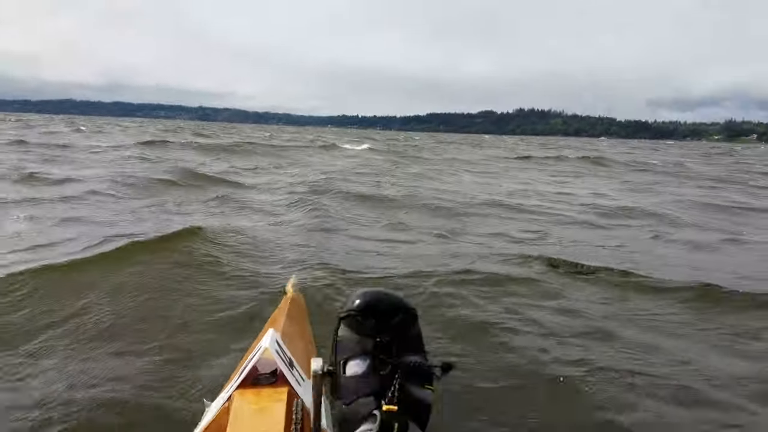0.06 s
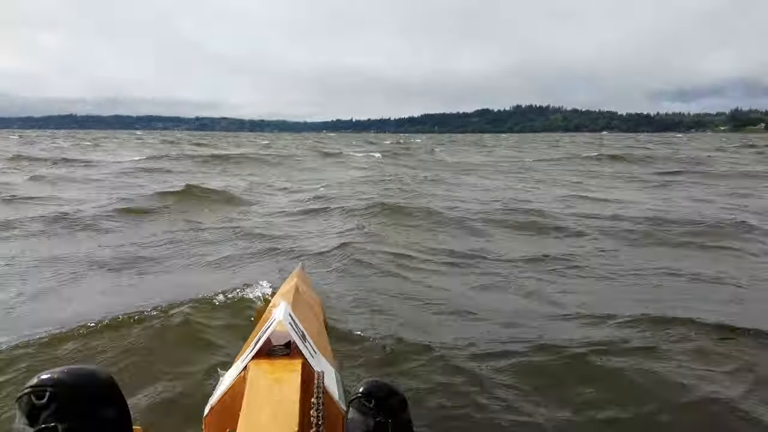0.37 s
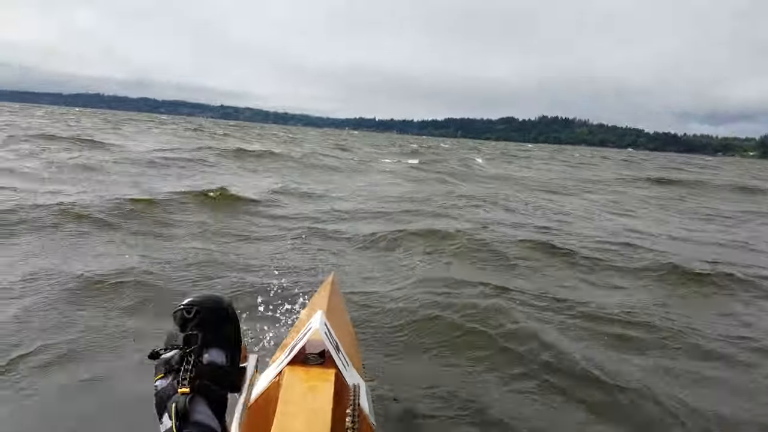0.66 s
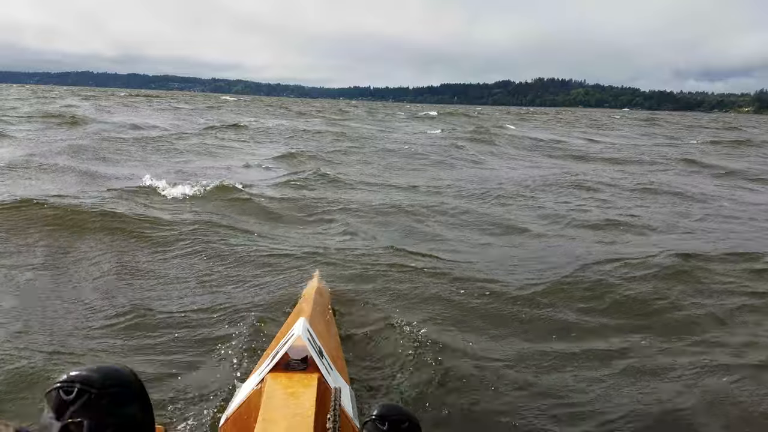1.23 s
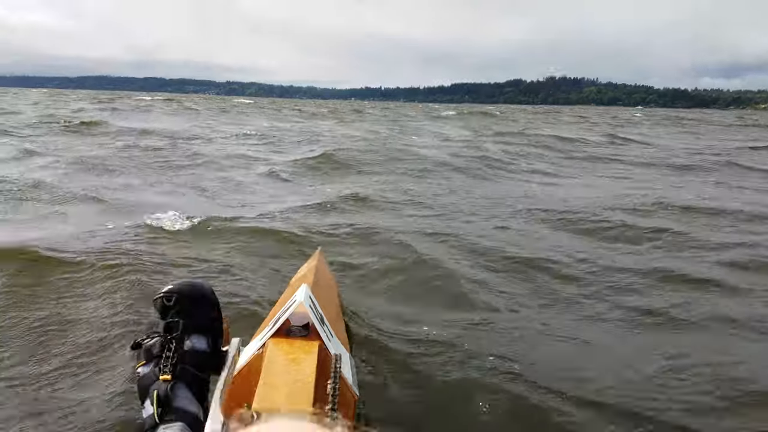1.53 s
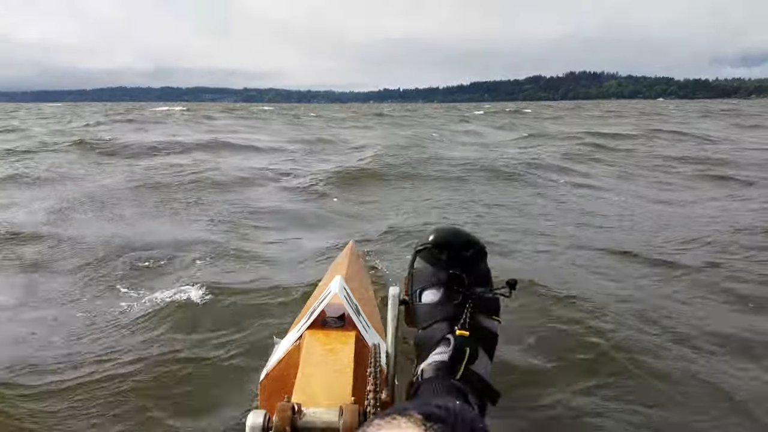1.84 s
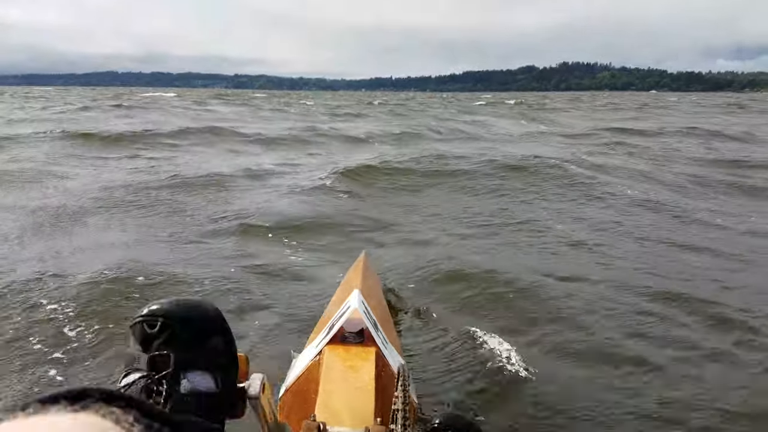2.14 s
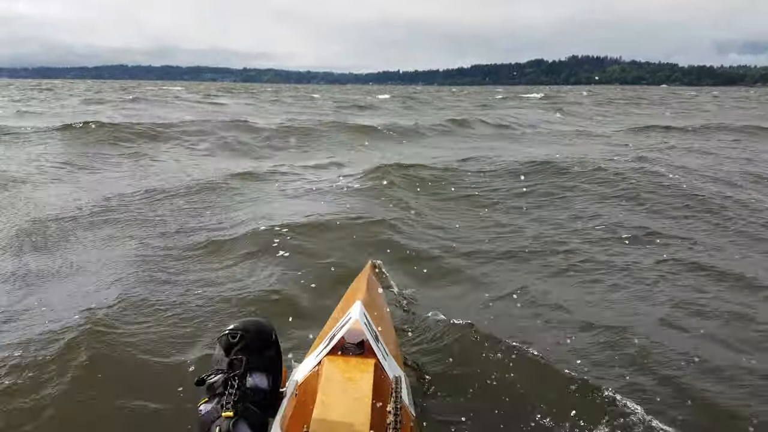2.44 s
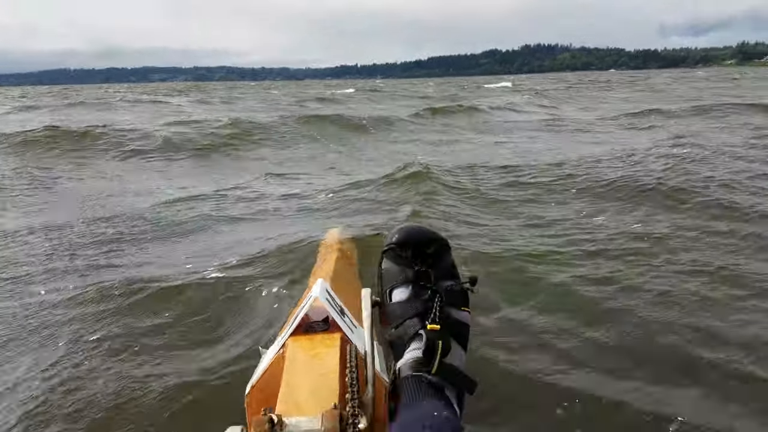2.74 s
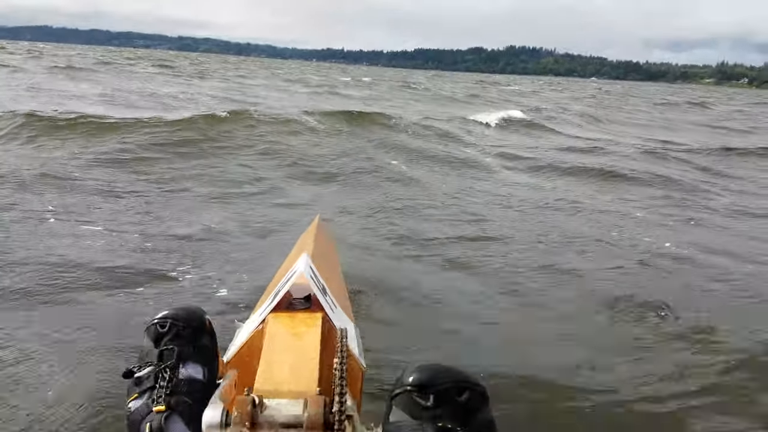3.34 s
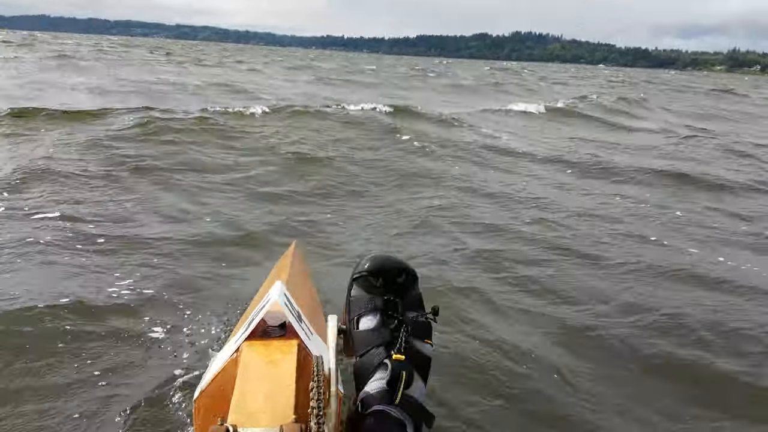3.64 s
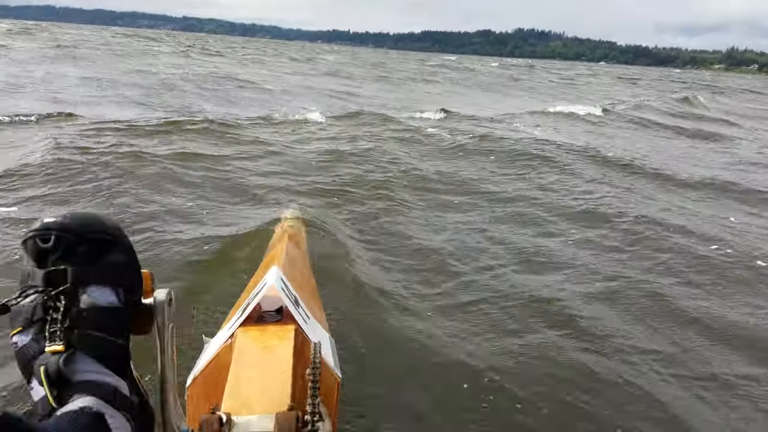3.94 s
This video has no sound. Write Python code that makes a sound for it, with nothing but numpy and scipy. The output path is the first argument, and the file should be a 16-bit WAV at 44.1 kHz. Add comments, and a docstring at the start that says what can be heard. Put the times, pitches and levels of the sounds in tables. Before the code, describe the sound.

A high, fluttering whistle of wind, with buffeting rumble and small splashes against a hull

```python
"""A pedal boat heads into a stiff wind on choppy open water. Throughout, gusts rumble on both
microphones, waves slap the hull and spray patters over the wash. From the start the wind whistles
across an edge at the left microphone, its pitch following the air speed. Around 2 s turbulence
breaks the tone into hoarse bursts and eddies buffet hardest. The whistle climbs back, then from
3.4 s stays mostly in its lower, hoarser register as the wash swells."""
import sys
import numpy as np
from scipy import signal
from scipy.fft import rfft, irfft
from scipy.io import wavfile
from scipy.ndimage import uniform_filter1d

SR = 44100
rng = np.random.default_rng(int(sys.argv[2]) if len(sys.argv) > 2 else 0)


def unload_audio(sound):
    """Save the sound as a 16-bit wav file, at the path given as the first command line argument."""
    columns = np.transpose(np.atleast_2d(sound))
    # keep every value between -1 and 1, then stretch to whole-number steps
    steps = np.round(np.clip(columns, -1, 1) * 32767)
    wavfile.write(sys.argv[1], SR, steps.astype(np.int16))


N = 176400
TIME_S = np.arange(N) / SR

# Wash of the water: (time [s], body level [dB], fizz level [dB])
WATER_LEVELS = [(0.0, -51.5, -77), (0.46, -53.5, -57), (0.98, -50.5, -58), (1.96, -51.5, -59),
                (2.07, -53.5, -62.5), (2.52, -56.5, -62.5), (2.73, -54, -59.5), (3.3, -54, -58),
                (3.55, -46, -52.5), (4.0, -48, -56.5)]
# Spray thrown up by the bow: (centre [s], length [s], level [dB])
SPRAY_SHEETS = [(0.177, 0.3, -35.5), (0.78, 0.05, -32.5), (0.846, 0.033, -32), (0.962, 0.12, -36.5),
                (1.457, 0.094, -37), (1.949, .06, -44), (2.298, 0.036, -30), (2.648, 0.11, -49),
                (2.823, 0.057, -39), (3.41, 0.12, -32.5), (3.519, 0.037, -39), (3.737, 0.11, -39)]
# Waves on the hull: (time [s], unused, slap [dB], splash [dB], spray [dB], left minus right [dB])
HULL_WAVES = [(0.102, -19, -40, -39, -60, -4), (0.152, -30, -49, -34, -41, -6),
              (0.184, -28, -36, -34, -37.5, -3), (0.739, -18, -30.5, -39, -30.5, 0),
              (0.777, -12.5, -36, -35, -33, 4), (0.829, -19, -50, -31.5, -57, -11),
              (0.979, -25, -48, -50, -39, -8), (1.109, -7, -28, -33.5, -40, 3.5),
              (1.297, -22.5, -22, -38, -43, 2), (1.541, -20, -30, -43, -64, -6),
              (1.805, -20.5, -34, -34.5, -45, -11), (1.924, -13, -21.5, -28.5, -43.5, -3.5),
              (2.113, -26, -52, -40, -43.5, -7), (2.206, -16, -28.5, -38.5, -63, -12.5),
              (2.279, -24, -51, -33.5, -49, -15), (2.309, -16, -47, -39, -43, -6),
              (2.597, -18, -27.5, -31.5, -45, -6.5), (2.796, -35, -36, -35, -39, 0),
              (2.844, -17.5, -23, -35.5, -57, -6), (3.123, -13, -25.5, -31.5, -57, -7.5),
              (3.248, -3, -28.5, -36.5, -67, -8), (3.371, -21.5, -29, -29.5, -31, -7.5),
              (3.404, -25.5, -27.5, -32, -38, -4), (3.434, -14, -24.5, -38, -45, -7),
              (3.49, -19, -52, -37, -42, -11), (3.513, -9.5, -21, -24.5, -36.5, -4.5),
              (3.673, -25, -31.5, -32.5, -35.5, -7), (3.751, -22, -23, -29.5, -63, -10.5),
              (3.896, -11.5, -26, -35, -53, -17)]
# Water spectra: (frequency [Hz], level [dB])
WASH_SPECTRUM = [(100, 7), (500, 14), (1000, -8.5), (1600, 8), (2200, -6.5), (3000, -10), (4500, -9.5),
                 (6000, -16.5), (7800, -23), (9500, -28), (16000, -22)]
FIZZ_SPECTRUM = [(1000, -31), (5000, 3.5), (7800, 5.5), (9500, -5), (12500, 2.5), (16000, 0.5)]
SHEET_SPECTRUM = [(600, -24), (1800, 6.5), (3000, 0), (5000, -9.5), (7800, -11.5), (9500, -16.5),
                  (12500, -14), (16000, -13)]
SLAP_SPECTRUM = [(100, -21.5), (600, 3), (1000, -2.5), (1400, 2.5), (1900, -5), (2800, -19.5), (5000, -31),
                 (16000, -56)]
SPLASH_SPECTRUM = [(500, -51), (1800, 7.5), (3000, 5), (4500, 0.5), (6000, -5), (7800, -10), (9500, -25),
                   (16000, -35)]
# Wind on the microphones: (time [s], level [dB], left minus right [dB])
WIND_LEVELS = [(0.0, -24, 12), (0.041, -22.5, -8.5), (0.499, -17, 9.5), (0.64, -17.5, -9), (0.72, -19, -1),
               (0.81, -17, 5), (0.858, -24, -15), (1.0, -20, -3.5), (1.02, -17, 5), (1.349, -21, 7.5),
               (1.41, -21.5, -11), (1.85, -20.5, 10.5), (1.92, -21.5, -5), (2.06, -18, 16.5),
               (2.22, -28.5, 2.5), (2.35, -23, 9), (2.6, -23.5, -4.5), (2.67, -23.5, 2), (2.8, -27, 3),
               (3.17, -25.5, -2.5), (3.26, -35, -2), (3.309, -21, 10.5), (3.38, -25, -0.5),
               (3.49, -19.5, 10.5), (3.58, -18.5, -5), (3.81, -20.5, 4.5), (3.929, -19.5, -9.5),
               (4.0, -17, 2)]
# Eddies at the left microphone: (centre [s], length [s], level [dB])
EDDIES = [(0.422, 0.023, -14), (0.512, 0.026, -11.5), (0.814, 0.018, -6), (1.042, 0.032, -18.5),
          (1.162, 0.0062, -8), (1.26, 0.034, -15.5), (1.673, 0.0083, -8), (1.796, 0.048, -15),
          (1.846, 0.018, -14), (1.951, 0.044, -16), (2.009, 0.016, -4.5), (2.052, 0.02775, -0.5),
          (2.085, 0.013, -8.5), (2.362, 0.028, -14), (2.637, 0.0094, -10), (2.978, 0.031, -19.5),
          (3.623, 0.0079, -12.5), (3.906, 0.018, -13)]
# Air spectra: (frequency [Hz], level [dB])
RUMBLE_SPECTRUM = [(20, -43), (40, -15), (75, -4), (120, 0.5), (224, -1), (400, -9), (650, -17),
                   (900, -23.5), (1400, -30), (2500, -38.5), (6000, -66)]
EDDY_SPECTRUM = [(30, -32), (90, 3), (200, -10), (450, -7), (900, -12.5), (1400, -18.5), (2400, -22),
                 (3200, -35), (8000, -63), (16000, -62)]
KICK_SPECTRUM = [(80, -19), (450, -1.5), (2300, -12.5), (3200, -37), (8000, -62)]
RUSH_SPECTRUM = [(300, -25), (800, 6.5), (1300, -12), (1700, 0), (2500, -24), (2800, -16), (3200, -29),
                 (8000, -59), (16000, -70)]
# Hoarse bursts: (start [s], length [s], pitch [Hz], level [dB], half-pitch level [dB])
RASP_BURSTS = [(1.662, 0.021, 1907, -14.5, -19.5), (1.7, 0.032, 1688, -21.5, -14.5),
               (1.766, 0.049, 1740, -15.5, -27.5), (1.83, 0.014, 1750, -16.5, -16),
               (2.083, 0.02, 1900, -15.5, -17), (2.105, 0.044, 1710, -34, -32.5),
               (2.184, 0.013, 1737, -19, -22.5), (2.276, 0.019, 1630, -24.5, -23),
               (2.359, 0.016, 1866, -20, -37)]
# Whistle registers, one list per gust: (time [s], pitch [Hz], level [dB])
LOW_REGISTER = [
    [(0.403, 1550, -27), (0.411, 1608, -20.5), (0.43, 1570, -22.5)],
    [(1.334, 1660, -16.5), (1.348, 1462, -25)],
    [(1.577, 1605, -35), (1.585, 1775, -16), (1.647, 1406, -26.5)],
    [(2.129, 1738, -19.5), (2.153, 1369, -29.5), (2.168, 1610, -50)],
    [(2.307, 1680, -20.5), (2.341, 1670, -27), (2.352, 1770, -22)],
    [(3.428, 1234, -29), (3.46, 1298, -21.5), (3.495, 1460, -22.5)],
    [(3.621, 1341, -31), (3.629, 1364, -28.5), (3.65, 1200, -26)],
    [(3.735, 1350, -22), (3.763, 1523, -26), (3.768, 1482, -16)],
    [(3.803, 1440, -22.5), (3.86, 1380, -23.5), (3.89, 1200, -30), (3.915, 1406, -19), (3.972, 1303, -25.5)],
]
HIGH_REGISTER = [
    [(0.0, 2057, -14), (0.022, 1820, -37.5)],
    [(0.102, 1944, -25), (0.114, 1940, -19), (0.206, 2392, -16), (0.272, 2323, -18.5), (0.302, 2030, -19),
     (0.34, 2060, -19.5), (0.368, 2506, -16.5), (0.398, 2495, -23.5)],
    [(0.422, 2323, -24), (0.436, 2190, -20), (0.508, 1975, -25), (0.524, 2217, -27), (0.54, 1860, -23.5),
     (0.558, 1870, -18.5)],
    [(0.663, 1897, -16), (0.677, 2370, -18.5), (0.725, 2590, -18), (0.735, 2346, -21.5),
     (0.781, 2177, -18.5), (0.8, 2620, -19.5), (0.811, 3050, -24.5), (0.823, 2600, -17),
     (0.935, 2704, -18.5), (0.977, 2450, -18.5), (0.992, 2046, -19.5), (1.037, 2670, -16),
     (1.091, 2490, -17), (1.112, 2007, -21)],
    [(1.155, 2140, -25), (1.173, 2610, -21.5), (1.211, 1970, -19.5), (1.247, 2543, -23.5),
     (1.259, 2100, -20.5), (1.289, 2280, -26), (1.308, 1827, -22.5), (1.325, 2653, -24),
     (1.353, 2205, -17.5), (1.369, 2543, -21), (1.423, 2115, -17.5), (1.511, 2270, -20),
     (1.545, 2443, -20.5), (1.572, 2387, -22.5)],
    [(1.635, 2044, -26), (1.651, 2450, -21), (1.672, 2760, -36)],
    [(1.812, 2590, -40), (1.848, 2570, -15), (1.874, 1980, -23), (1.902, 2290, -19.5), (1.938, 2100, -20),
     (1.958, 2454, -24), (1.986, 2010, -19.5), (2.0, 2003, -41)],
    [(2.025, 1925, -24), (2.067, 2536, -26.5), (2.08, 2593, -23)],
    [(2.158, 2238, -36), (2.172, 2462, -21), (2.184, 2693, -47)],
    [(2.37, 2607, -21), (2.403, 2194, -22), (2.478, 2648, -22), (2.552, 2150, -22.5), (2.582, 1917, -31),
     (2.59, 2240, -21), (2.63, 2110, -26.5), (2.656, 2550, -23), (2.674, 2306, -30.5), (2.716, 2430, -24),
     (2.75, 2077, -24), (2.802, 2140, -28), (2.82, 1920, -23.5)],
    [(2.891, 1890, -24.5), (2.917, 2634, -23), (2.937, 2170, -22), (2.969, 2590, -25), (2.983, 2150, -18.5),
     (3.001, 2290, -28), (3.01, 2150, -23)],
    [(3.032, 2056, -23.5), (3.085, 1900, -30.5)],
    [(3.305, 1876, -21), (3.317, 2087, -24.5), (3.343, 1930, -24), (3.415, 2017, -28.5)],
    [(3.7, 2050, -22), (3.732, 2174, -21.5)],
]
# Whistle overtones: (multiple of pitch, base level [dB])
WHISTLE_OVERTONES = [(2, -30.5), (3, -42)]

JITTER_RATE_HZ, FLUTTER_RATE_HZ = 110, 220


def amp(db):
    """Decibels to gain."""
    return 10 ** (np.asarray(db) / 20)


def unit(x):
    """Scale to rms 1."""
    return x / np.sqrt(np.mean(x ** 2) + 1e-20)


def add(mix, start_s, sound):
    """Mix a sound in at a time."""
    part = mix[..., max(round(start_s * SR), 0):][..., :sound.shape[-1]]
    part += sound[..., :part.shape[-1]]


def colour(x, spectrum):
    """Filter by a spectrum; rms 1."""
    n = x.shape[-1]
    hz, db = np.transpose(sorted(spectrum))
    gain = amp(np.interp(np.log(np.fft.rfftfreq(n, 1 / SR) + 1), np.log(hz + 1), db))
    return unit(irfft(rfft(x) * gain, n))


def wander(rate_hz):
    """Smooth random signal up to a rate; rms 1."""
    rolloff = 1 + (np.fft.rfftfreq(N, 1 / SR) / rate_hz) ** 4
    return unit(irfft(rfft(rng.standard_normal(N)) / rolloff, N))


def flicker_noise(spectrum, depth_db, rate_hz):
    """Coloured noise with a flickering level."""
    return colour(rng.standard_normal(N) * amp(depth_db * wander(rate_hz)), spectrum)


def gate(start_s, end_s, edge_s=0.014):
    """Soft on and off."""
    inside_s = np.minimum(TIME_S - start_s, end_s - TIME_S)
    return np.sin(np.pi / 2 * np.clip(inside_s / edge_s + .5, 0, 1)) ** 2


def swells(events):
    """Envelope of one Gaussian swell per event."""
    return sum(amp(db) * np.exp(-(2 * (TIME_S - at_s) / length_s) ** 2) for at_s, length_s, db in events)


def patter(per_s, spread_db=5):
    """Random stereo impulses of uneven size."""
    hits = rng.random((2, N)) < per_s / SR
    return hits * amp(spread_db * np.minimum(rng.exponential(1, (2, N)), 2.6))


def wash(body_gain_db=18.5, fizz_gain_db=6, patch_db=5.5):
    """Water churns in drifting patches; foam fizzes above it."""
    time_s, body_db, fizz_db = np.transpose(WATER_LEVELS)
    bins = signal.stft(rng.standard_normal((2, N)), nperseg=512)[2]
    patches = uniform_filter1d(rng.standard_normal(bins.shape[1:]), size=7, axis=0)
    patches = unit(uniform_filter1d(patches, size=6, axis=1))
    churn = signal.istft(bins * amp(patch_db * patches), nperseg=512)[1][:, :N]
    body = colour(churn, WASH_SPECTRUM) * amp(np.interp(TIME_S, time_s, body_db) + body_gain_db)
    fizz = colour(rng.standard_normal((2, N)), FIZZ_SPECTRUM)
    return body + fizz * amp(np.interp(TIME_S, time_s, fizz_db) + fizz_gain_db)


def bubbles_and_drops(bubbles_per_s=650, pitches=20, decay_cycles=0.54, tick_decay_s=0.00091):
    """Short-lived bubbles crackle in the chop and drops tick on the deck; both follow the wash."""
    t, bubbles = TIME_S[:SR // 25], 0
    for hz in np.geomspace(1000, 2200, pitches):
        cycles = hz * t
        ring = np.sin(2 * np.pi * cycles) * np.exp(-cycles / decay_cycles)
        bubbles += signal.oaconvolve(patter(bubbles_per_s / pitches), ring[None], axes=1)[:, :N]
    tick_envelope = signal.lfilter([1], [1, -np.exp(-1 / (tick_decay_s * SR))], patter(per_s=61))
    tick_envelope = tick_envelope + .5 * tick_envelope[::-1]  # crossfeed
    ticks = colour(tick_envelope * rng.standard_normal((2, N)), FIZZ_SPECTRUM)
    time_s, body_db, _ = np.transpose(WATER_LEVELS)
    return (amp(-42) * unit(bubbles) + amp(-54) * ticks) * unit(amp(np.interp(TIME_S, time_s, body_db)))


def bow_spray():
    """Sheets of spray fall in grainy swells."""
    grains = [flicker_noise(SHEET_SPECTRUM, depth_db=6, rate_hz=340) for side in range(2)]
    return swells(SPRAY_SHEETS) * np.array(grains)


def burst(spectrum, rise_s, decay_s):
    """Stereo noise burst."""
    t = TIME_S[:SR // 8]
    noise = colour(rng.standard_normal((2, len(t))), spectrum)
    return noise * (1 - np.exp(-t / rise_s)) ** 2 * np.exp(-t / decay_s)


def hull_slaps(splash_rise_s=0.0018):
    """Each wave gives a hollow slap, a brighter splash and a tick of spray."""
    out = np.zeros((2, N))
    for time_s, _, slap_db, splash_db, spray_db, pan_db in HULL_WAVES:
        slap = amp(slap_db + 10.5) * burst(SLAP_SPECTRUM, rise_s=0.0016, decay_s=0.011)
        splash = amp(splash_db + 12) * burst(SPLASH_SPECTRUM, splash_rise_s, decay_s=0.0048)
        spray = amp(spray_db + 12) * burst(FIZZ_SPECTRUM, rise_s=0.0027, decay_s=0.0055)
        add(out, time_s - splash_rise_s, (slap + splash + spray) * amp([[pan_db / 2], [-pan_db / 2]]))
    return out


def left_bias():
    """Gain for how much the turbulence favours the left microphone."""
    time_s, _, pan_db = np.transpose(WIND_LEVELS)
    return amp(.4 * np.interp(TIME_S, time_s, pan_db))


def turbulence_kicks(base_per_s=30, length_s=.007):
    """Brief kicks of turbulence, 0-1; more frequent when the wind leans left."""
    impulses = (rng.random(N) < base_per_s * left_bias() / SR) * np.sqrt(rng.random(N))
    return np.minimum(signal.oaconvolve(impulses, np.hanning(round(length_s * SR)), "same"), 1)


def wind(kicks, gain_db=3):
    """Gusts rumble independently on each microphone; kicks crackle and eddies buffet on the left."""
    time_s, level_db, pan_db = np.transpose(WIND_LEVELS)
    left_db = np.interp(TIME_S, time_s, pan_db) / 2
    sides = amp([left_db, -left_db])
    sides /= np.sqrt(np.mean(sides ** 2, axis=0))
    out = np.array([flicker_noise(RUMBLE_SPECTRUM, depth_db=2, rate_hz=33) for side in sides])
    out[0] += amp(-1) * kicks ** 2 * colour(rng.standard_normal(N), KICK_SPECTRUM)
    out *= sides * amp(np.interp(TIME_S, time_s, level_db) + gain_db)
    out[0] += swells(EDDIES) * colour(rng.standard_normal(N), EDDY_SPECTRUM)
    return out


def rasps(jitter=0.0415, flutter_db=2, fifth_db=-25):
    """The whistle breaks up: every second cycle differs, adding lines at 0.5 and 1.5 times the pitch."""
    out = np.zeros(N)
    clock_s = np.cumsum(1 + jitter * wander(JITTER_RATE_HZ)) / SR
    for start_s, length_s, hz, db, half_db in RASP_BURSTS:
        phase = 2 * np.pi * hz * clock_s
        half, main, fifth = (np.sqrt(2) * np.sin(k * phase) for k in (.5, 1, 1.5))
        tone = amp(half_db) * half + amp(db) * (main + amp(fifth_db) * fifth)
        out += gate(start_s, start_s + length_s) * tone
    return out * amp(flutter_db * wander(FLUTTER_RATE_HZ))


def whistle(gusts, kicks, min_turbulence=0, jitter=.012, kick_sag=.06):
    """Edge tone with weak overtones and a rush of air; turbulence shakes its pitch and level."""
    time_s, pitch_hz, db = np.transpose(sorted(row for gust in gusts for row in gust))
    level_db = np.interp(TIME_S, time_s, db)
    sounding = sum(gate(gust[0][0], gust[-1][0]) for gust in gusts)
    turbulence = np.maximum(left_bias(), min_turbulence) + 2 * swells(EDDIES)
    bend = 1 + turbulence * (jitter * wander(JITTER_RATE_HZ) - kick_sag * kicks)
    phase = 2 * np.pi * np.cumsum(np.interp(TIME_S, time_s, pitch_hz) * bend) / SR
    overtones = sum(amp(base_db) * np.sin(k * phase) for k, base_db in WHISTLE_OVERTONES)
    brightness_db = 2.5 * wander(FLUTTER_RATE_HZ) + 0.46 * (level_db + 21.5)  # louder is brighter
    tone = unit(np.sin(phase) + overtones * amp(brightness_db))
    sputter_db = turbulence * (2.2 * np.tanh(wander(FLUTTER_RATE_HZ)) - 12 * kicks)
    rush = amp(-23.5) * flicker_noise(RUSH_SPECTRUM, depth_db=9, rate_hz=JITTER_RATE_HZ)
    return sounding * amp(level_db) * (amp(sputter_db) * tone + turbulence * rush)


def scene(right_leak_db=-39):
    """Whistle on the left, wind and water all round."""
    kicks = turbulence_kicks()
    high = amp(6) * whistle(HIGH_REGISTER, kicks)
    low = amp(5) * whistle(LOW_REGISTER, kicks, min_turbulence=1.6)
    edge_tone = (high + low + rasps()) * amp([[0], [right_leak_db]])
    return edge_tone + wind(kicks) + wash() + hull_slaps() + bow_spray() + bubbles_and_drops()


def record(dry, limit_db=-8.5, recovery_db_per_s=121, cutoff_hz=15950):
    """A limiter ducks both sides on the strongest gusts; then clip and low-pass."""
    power = abs(uniform_filter1d(dry ** 2, size=300, axis=1)).max(0)
    fall_db = TIME_S * recovery_db_per_s
    held_db = np.maximum.accumulate(10 * np.log10(power + 1e-12) + fall_db) - fall_db
    duck_db = uniform_filter1d(np.maximum(held_db - limit_db, 0), size=150)
    ducked = np.clip(dry / amp(duck_db), -1, 1)
    lowpass = signal.firwin(511, cutoff_hz, window=("kaiser", 9), fs=SR)
    return signal.oaconvolve(ducked, lowpass[None], "same")


dry = scene()
out = record(dry)
unload_audio(out)
```